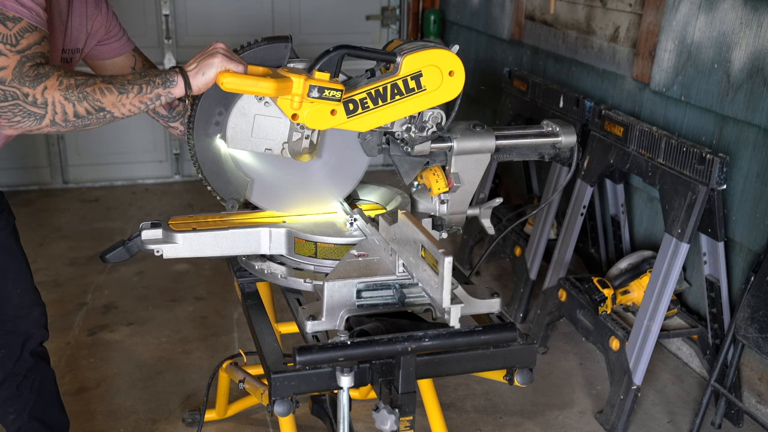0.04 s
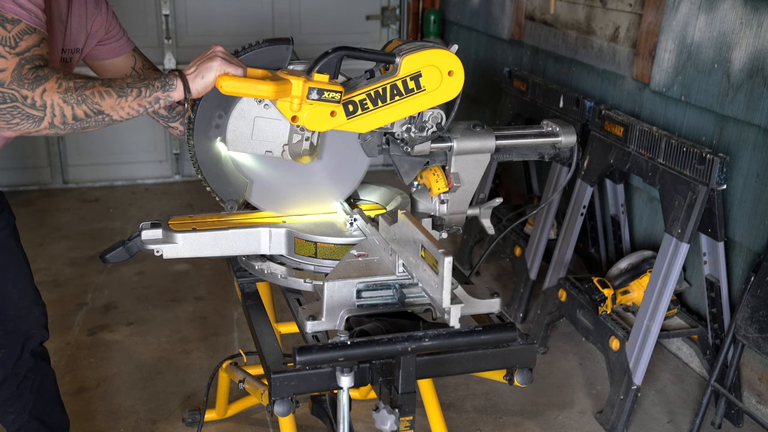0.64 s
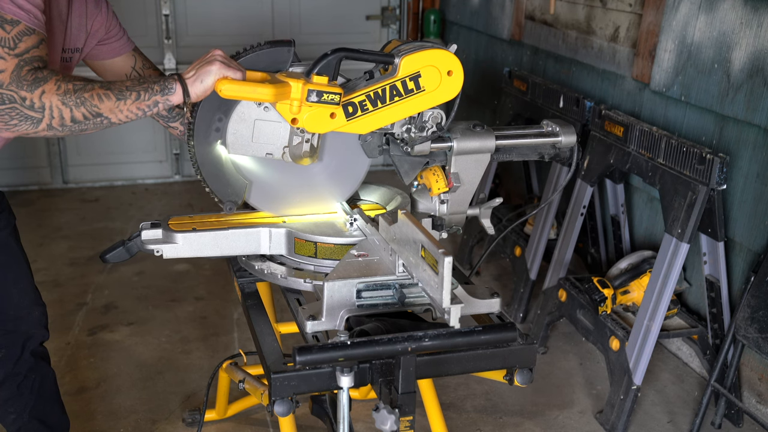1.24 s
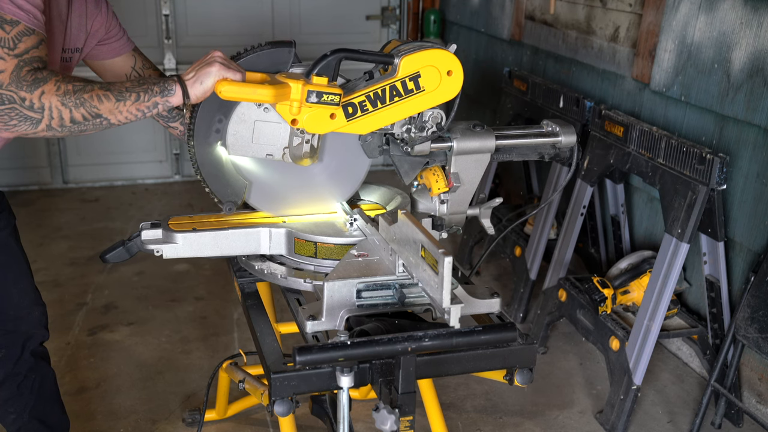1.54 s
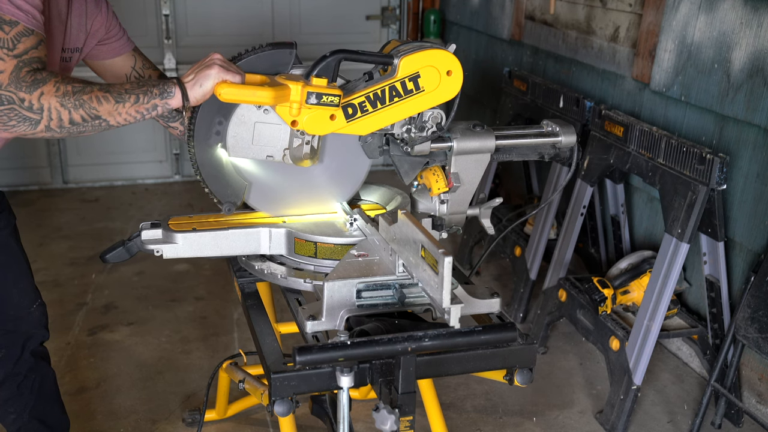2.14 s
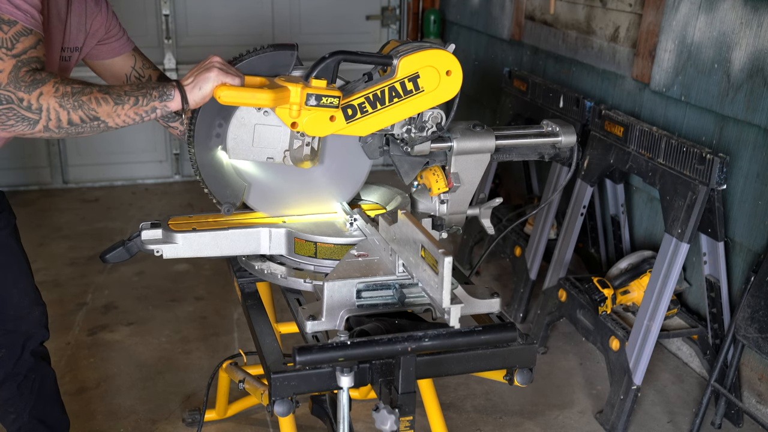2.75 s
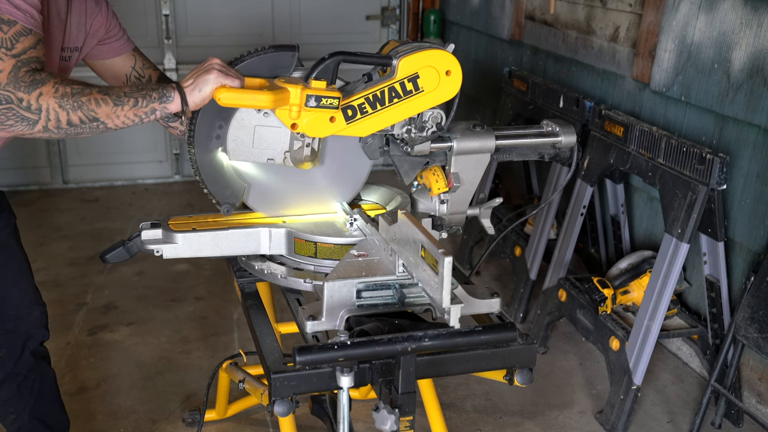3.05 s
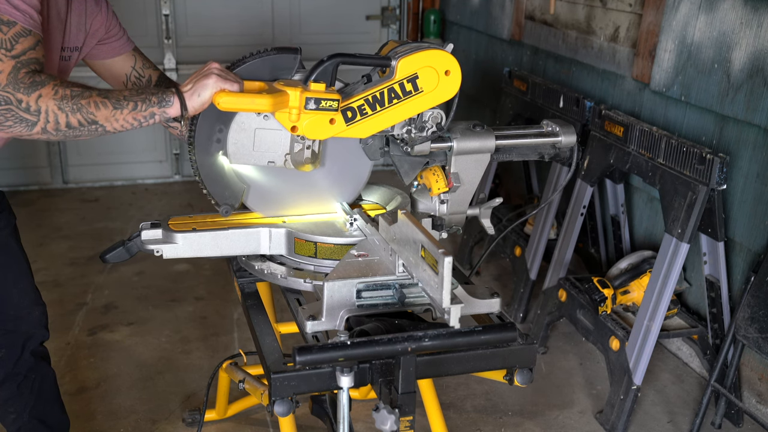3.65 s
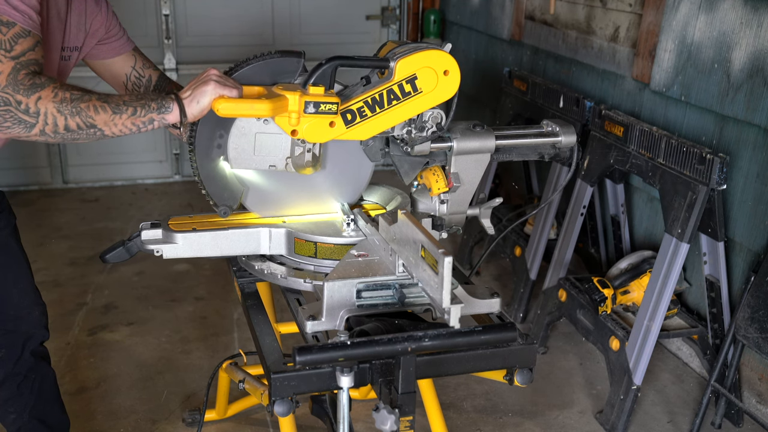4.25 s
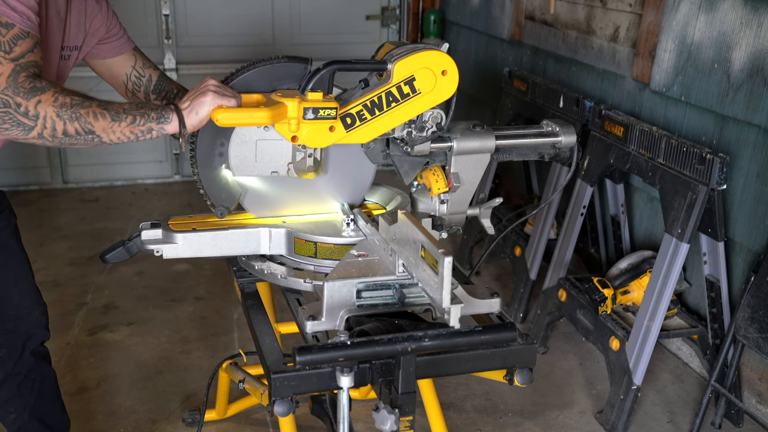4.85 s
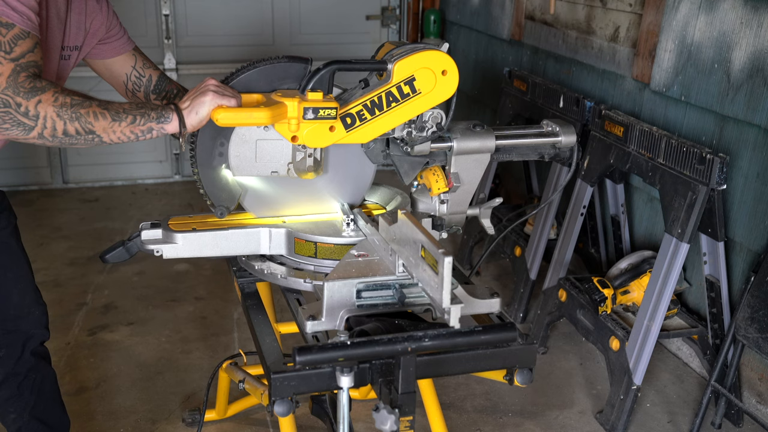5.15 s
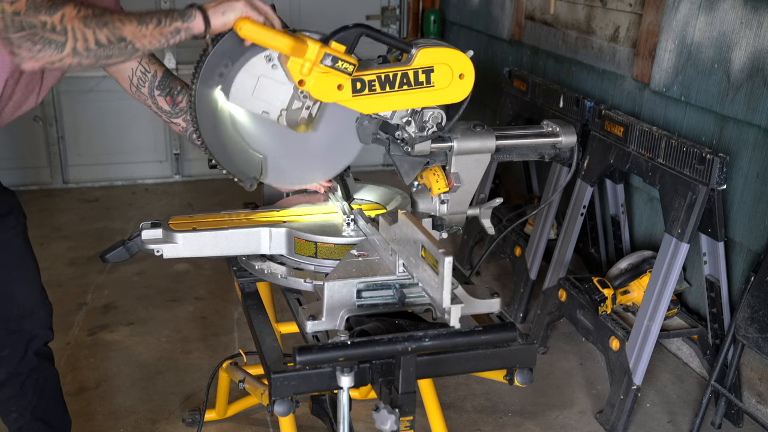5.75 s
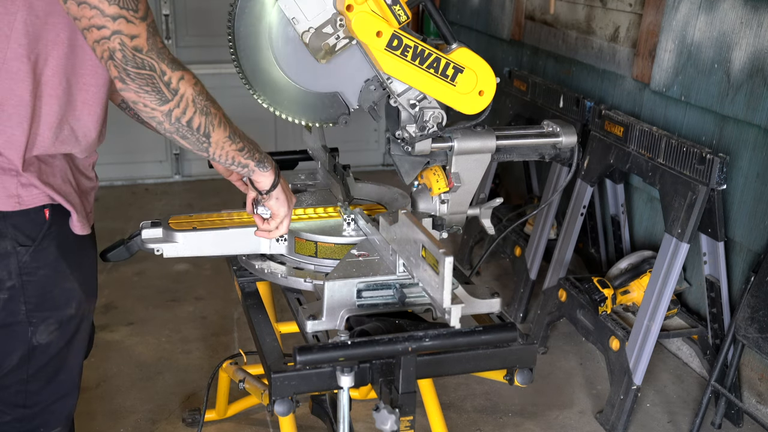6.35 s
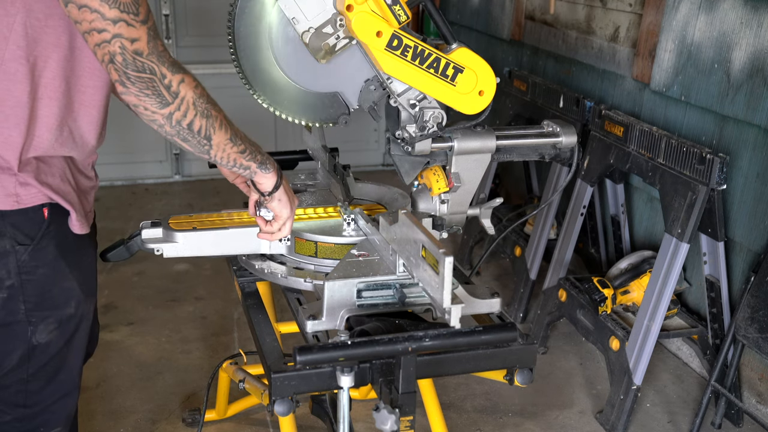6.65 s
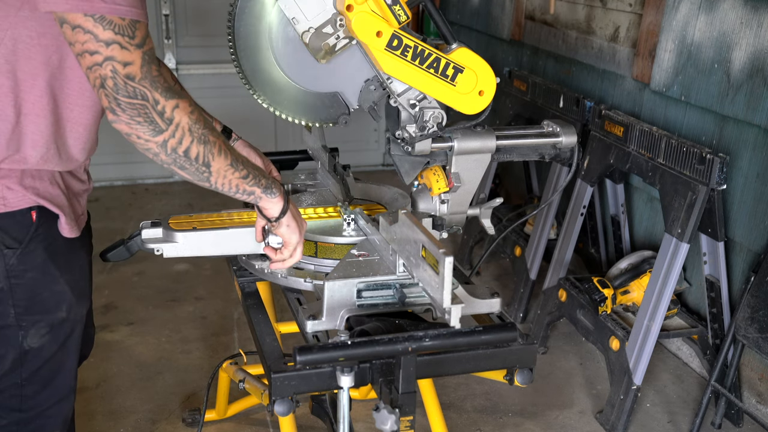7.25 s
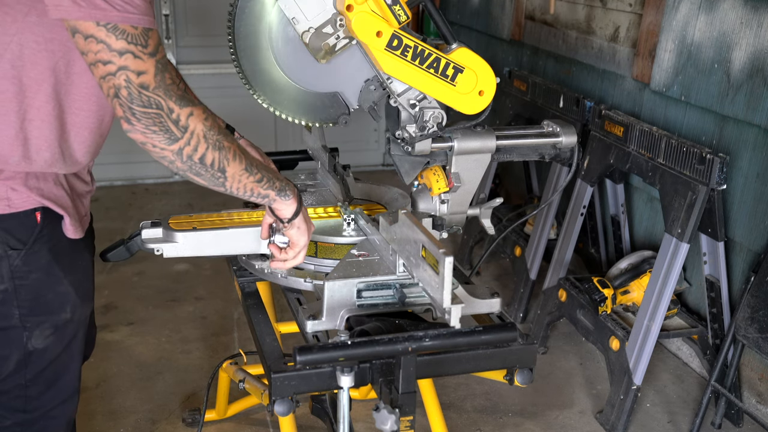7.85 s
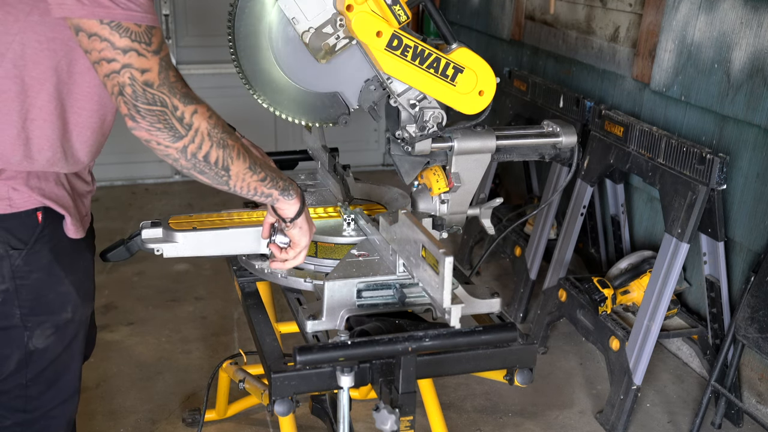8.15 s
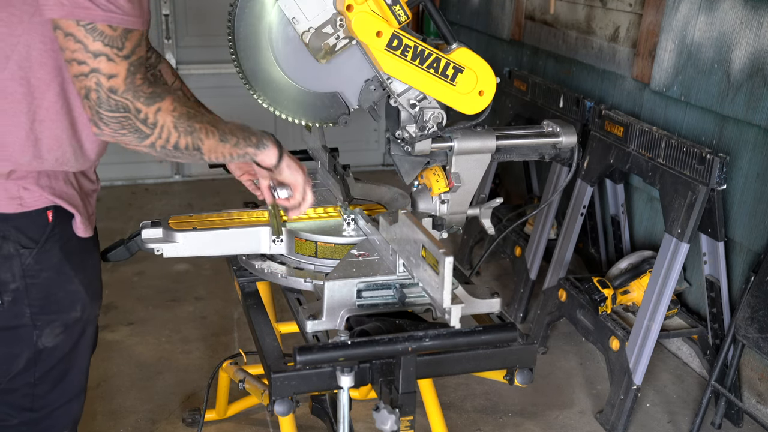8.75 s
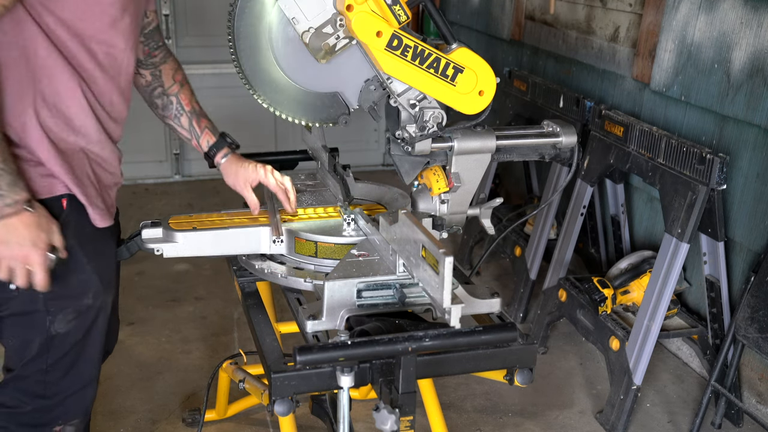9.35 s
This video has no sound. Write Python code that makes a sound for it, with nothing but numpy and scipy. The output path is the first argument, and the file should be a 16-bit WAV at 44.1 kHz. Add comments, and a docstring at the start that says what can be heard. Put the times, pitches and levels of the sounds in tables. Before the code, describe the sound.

From the start, a mitre saw cuts loudly through an aluminium bar in a garage with a short echo. The teeth rasp harshly over the rushing, whining motor, while the blade rings and squeals at shifting high pitches. The motor sags slightly under the load, and the loudness stays even. At about 4.3 seconds the cut ends and the motor runs free, rising a little in pitch, with a few small ticks of loose chips. At 5.7 seconds it is switched off and winds down in fluttering, falling gear whines, which break off abruptly at about 6.4 seconds. A low, quiet room rumble remains. The cut-off piece clinks lightly on the saw table several times until about 7.2 seconds. From 8.7 seconds it taps and scrapes softly across the table, and is put down with a sharp clack at 9 seconds, followed by one faint scrape.

```python
"""In a garage, a mitre saw bites through an aluminium bar: the teeth rasp, the blade rings and squeals.
Pushing the saw slows its motor; the harder the cut, the more the recorder's automatic volume control
turns down fan and room. Once through, the motor runs free, is switched off and winds down in falling
gear whines until the sound breaks off. Over a low room rumble the cut-off piece clinks, scrapes across
the table and is put down with a clack."""
import sys
import numpy as np
from scipy import signal
from scipy.fft import rfft, irfft, next_fast_len
from scipy.io import wavfile
from scipy.ndimage import uniform_filter1d

SR = 44100
rng = np.random.default_rng(int(sys.argv[2]) if len(sys.argv) > 2 else 0)


def to_wav(s):
    """Save 16-bit WAV."""
    ch = np.atleast_2d(s).T  # columns
    pcm = np.round(np.clip(ch, -1, 1) * 32767)  # PCM
    wavfile.write(sys.argv[1], SR, pcm.astype(np.int16))


N = 418950
T = np.arange(N) / SR
THROUGH_S, SWITCH_OFF_S, BREAK_OFF_S = 4.28, 5.715, 6.354
FREE_SPEED = 358  # motor turns per second with nothing to cut

# motor speed as the hand pushes the saw into the bar: time_s, turns_per_s
LOADED_SPEEDS = [(0, 338.5), (0.58, 332.2), (1.1, 337), (1.35, 336.5), (2.1, 326.9), (3.08, 319.3),
                 (3.56, 332.6), (3.85, 332.8), (4.1, 327)]


def cut(speed, turns, cutting, force_db):
    """Each tooth tears off a chip of random size; the slightly uneven blade presses harder once a turn."""
    # tone colour of the teeth tearing metal: pitch_hz, level_db
    rasp_colour = [(500, -30), (1500, -7), (2000, -7.5), (3500, -10.5), (4600, 0.5), (5600, 3.5),
                   (6400, 5.5), (7500, 2.5), (9000, 5), (10200, 4), (13000, 3.5), (14500, 1.5),
                   (15500, -5.5)]
    # loose chips caught by the teeth: time_s, level_db
    loose_chips = [(4.725, -31), (4.995, -34), (5.535, -28), (5.6, -23.5), (5.625, -33)]
    gear_ratio, teeth = .17575, 80  # blade turns per motor turn; teeth on the blade
    blade_turns = turns * gear_ratio
    tooth = (blade_turns * teeth).astype(int)
    chip_sizes = amp(2.5 * rng.standard_normal(tooth[-1] + 1))[tooth]
    sway = np.sin(2 * np.pi * blade_turns)
    entry_db = -9 * np.exp(-T / .14)  # weaker while the teeth first sink in
    bite_db = entry_db + .35 * rubbing() + .68 * wobble(12)
    pressure = amp(-24 + force_db + bite_db + 2 * sway + 1.7 * wobble(50)) * cutting
    for time_s, db in loose_chips:
        pressure += amp(db) * np.exp(-np.abs(T - time_s) / .012)
    tearing = coloured(chip_sizes * rng.standard_normal(N), rasp_colour)
    rasp = pressure * rippled(tearing, depth_db=3, spacing_hz=45)
    ring = blade(speed * gear_ratio * teeth, bite_db, touching=1 - after(THROUGH_S + .03, .12))
    return garage(rasp, wet_db=-2.5) + ring * amp(force_db * cutting + .72 * sway)


def blade(tooth_hz, bite_db, touching):
    """The teeth ring bar and blade; rubbing makes the middle notes screech, and some catch and squeal."""
    # lower ringing notes of the blade and the clamped bar: pitch_hz, level_db
    bar_notes = [(2514, -36.5), (2967, -38), (3171, -36.5), (3300, -35), (3537, -32), (3634, -35),
                 (3753, -35), (3903, -32), (4334, -38.5), (4560, -39), (4722, -43), (4840, -35),
                 (5131, -43), (5249, -37), (5658, -44), (5798, -45), (5927, -39), (6164, -41), (6283, -38),
                 (6466, -41)]
    # high ringing notes of the blade's rim: pitch_hz, level_db
    rim_notes = [(6541, -44), (6746, -39), (7316, -41), (7445, -44), (7768, -42), (8038, -45), (8113, -43),
                 (8318, -46), (8554, -46), (8802, -45), (8899, -45), (9050, -41), (9351, -42), (9534, -40),
                 (10083, -46), (10374, -42), (10460, -45), (10891, -48), (10988, -44), (11074, -43),
                 (12086, -46), (12667, -40), (12743, -43), (13539, -41), (14153, -45), (14336, -49),
                 (14681, -49), (14993, -49), (15230, -50), (15553, -52)]
    # notes that catch and squeal: peak_s, half_length_s, pitch_hz, level_db
    squeal_notes = [(.15, 0.28, 6480, -35.5), (0.118, .3, 9570, -33.5), (0.846, .45, 2520, -29.5),
                    (.645, .25, 5230, -23.5), (.69, 0.14, 4842, -26), (1.2, 1, 3560, -29.5),
                    (1.05, 0.68, 12730, -31), (1.68, 0.15, 5250, -28.5), (1.68, 0.26, 4840, -28),
                    (1.72, 0.47, 4480, -29), (1.85, .27, 9440, -31), (2.04, 0.3, 3308, -28.5),
                    (2.46, 0.21, 8318, -32), (2.75, .4, 13400, -35), (2.94, 0.45, 4490, -28),
                    (3.31, 0.33, 6300, -30.5), (3.5, 0.34, 3577, -26.5), (3.58, 0.15, 4661, -28.5),
                    (3.92, 0.63, 5923, -27.5), (4.11, 0.49, 5100, -31), (4.11, .3, 3210, -27.5),
                    (4.35, 0.45, 2776, -25.5)]
    split_hz = 4200
    low_notes = [(hz, db) for hz, db in bar_notes if hz < split_hz]
    middle_notes = [(hz, db) for hz, db in bar_notes if hz >= split_hz]
    low = amp(.8) * ringing(low_notes, tooth_hz, width_hz=14)
    screech = amp(-26 + rubbing()) * unit(ringing(middle_notes, tooth_hz, width_hz=10))
    rim = amp(-.7 + 1.8 * bite_db) * ringing(rim_notes, tooth_hz, width_hz=18)
    # the higher a squeal, the rougher it is
    squeals = sum(amp(db + 2 * wobble(35)) * swell(peak_s, half_s) * tone(hz * T, width_hz=hz / 600)
                  for peak_s, half_s, hz, db in squeal_notes)
    return (low + screech + rim) * touching + amp(-.5) * squeals


def ringing(notes, tooth_hz, width_hz):
    """Each note of the metal flickers on its own and grows when the teeth strike in step with it."""
    boost_db, near_hz = 5.5, 47
    total = np.zeros(N)
    for hz, db in notes:
        mismatch_hz = hz - np.round(hz / tooth_hz) * tooth_hz
        in_step = 1 / (1 + (mismatch_hz / near_hz) ** 2)
        flicker_db = 3.2 * wobble(3.5) + 2.2 * wobble(30)
        total += amp(db - .6 + boost_db * in_step + flicker_db) * tone(hz * T, width_hz)
    return total


def rubbing():
    """The rise in dB while the side of the blade rubs harder in its slot."""
    # harder rubs: peak_s, rise_db
    rubs = [(.66, 1.5), (1.66, 5.5), (2.22, 3.5), (2.85, 4), (3.1, 2), (4.02, 5)]
    return sum(db * swell(peak_s, half_s=.28) for peak_s, db in rubs)


def rippled(x, depth_db, spacing_hz):
    """The blade's many weak resonances make some pitches a little louder and others softer."""
    heights_db = depth_db * rng.standard_normal(1000)
    pitches_hz = spacing_hz * np.arange(len(heights_db))
    return unit(filtered(x, lambda hz: amp(np.interp(hz, pitches_hz, heights_db))))


def motor(speed, turns, cutting, force_db):
    """The fan rushes, the housing shakes, the brushes (sliding contacts) hiss and the drive whines."""
    # tone colours of fan, housing and brushes: pitch_hz, level_db
    fan_colour = [(100, -40.5), (200, -10.5), (300, -4.5), (500, 3), (800, -1), (1100, 1.5), (1550, 4.5),
                  (2000, -4), (2500, 4.5), (4000, 6.5), (5000, -10), (7600, -23.5), (10000, -21.5),
                  (12000, -30), (15500, -34.5)]
    housing_colour = [(200, -53.5), (1000, -10), (1500, -9.5), (2100, -7), (2600, -8), (3200, -0.5),
                      (3700, 3), (4150, -0.5), (4700, -12.5), (8000, -16), (11000, -24), (15500, -46)]
    brush_colour = [(3000, -16), (5000, 5.5), (7600, 2.5), (9000, -26.5), (12000, -4.5), (15500, -12.5)]
    powered = 1 - after(SWITCH_OFF_S, .04)
    octaves = np.log2(speed / FREE_SPEED)  # falls by 1 each time the speed halves
    fan = amp(-20.5 + 8 * octaves + .87 * wobble(4) + .51 * wobble(14)) * noise(fan_colour)
    # the housing shakes with the cutting force, then with the speed alone
    idle_db = -19.5 * powered - 20 * (1 - powered) + 7.5 * octaves
    shake_db = (-22.5 + force_db) * cutting + idle_db * (1 - cutting)
    shake = amp(shake_db + .78 * wobble(7) + 1.7 * wobble(60)) * noise(housing_colour)
    brushes = amp(-31.5 + 1.1 * wobble(40)) * noise(brush_colour) * (speed / FREE_SPEED) ** 1.9
    rush = garage(fan + shake + brushes, wet_db=-5.5)
    return rush + whine(turns, cutting) * powered * amp(force_db * cutting)


def motor_speed():
    """Turns per second: held down by the cut, recovering afterwards, then slowed by brake and air."""
    recover_s, brake_s = .82, .91
    air_drag = 1.3  # how many times stronger than the brake at full speed
    release_s = LOADED_SPEEDS[-1][0]
    recovery_time = np.clip(T, release_s, SWITCH_OFF_S) - release_s
    driven = FREE_SPEED - (FREE_SPEED - curve(LOADED_SPEEDS)) * np.exp(-recovery_time / recover_s)
    braked = np.exp(-np.maximum(T - SWITCH_OFF_S, 0) / brake_s)
    return driven * braked / (1 + air_drag * (1 - braked))


def whine(turns, cutting):
    """Shaft, gears and teeth sing in step with the motor; free gears rattle and chop the high tones."""
    # tones under power: cycles_per_turn, width_hz, cutting_db, free_db
    drive_tones = [(1, .2, -40.5, -37), (1.37, 2, -44.5, -39), (1.69, 3, -49, -39.5), (2, .3, -46, -37),
                   (2.59, 3, -49.5, -38.5), (7.56, 5, -39, -38), (14.06, 30, -37, -42),
                   (15.81, 8, -40, -52), (19, 3, -48, -43), (22.4, 150, -42, -38), (27.95, 140, -35.5, -42),
                   (37.97, 90, -41, -54), (42.03, 110, -39, -52)]
    rattle = wobble(70)
    total = np.zeros(N)
    for per_turn, width_hz, cutting_db, free_db in drive_tones:
        level_db = free_db + (cutting_db - free_db) * cutting
        rattle_db = (3.5 * rattle - 2) * (1 - cutting) * (per_turn > 20)
        total += amp(level_db + 2 * wobble(7) + rattle_db) * tone(per_turn * turns, width_hz)
    return total


def coasting_gears(speed, turns):
    """Slack gears lose and find contact; their falling tones flutter, and flare where the case rings."""
    # tones of the slack gears: cycles_per_turn, level_db
    gear_tones = [(1, -28), (7.6, -19), (10.55, -32), (12.8, -33), (14.15, -20), (15.5, -30), (21.9, -28),
                  (22.7, -34), (26.2, -21), (28, -33), (30.6, -36), (38, -33), (42.2, -33), (56, -30),
                  (70.5, -31)]
    # how strongly the gear case passes each pitch: pitch_hz, level_db
    case_colour = [(120, -30), (200, -21.5), (300, -6), (520, -6.5), (750, -22.5), (1050, -25), (1480, -1),
                   (1700, -12), (1950, -3.5), (2200, -9), (2680, 1), (3000, -1.5), (3300, -2.5), (3750, 2),
                   (4100, -2), (4500, -14.5), (6500, -16), (9500, -10.5), (12000, -28.5)]
    gears = sum(amp(db + 3.6 * wobble(55)) * tone(per_turn * turns, width_hz=.45 * per_turn)
                for per_turn, db in gear_tones)
    # slower teeth strike more softly
    strength = after(SWITCH_OFF_S, .01) * amp(1.5) * (speed / FREE_SPEED) ** 1.2
    return garage(shaped(gears * strength, case_colour), wet_db=-3.5)


def offcut():
    """The cut-off piece knocks on the table and rings; between knocks it scrapes along."""
    # contacts with the table: start_s, level_db, ring_above_knock_db, fade_s
    taps = [(6.4, -51, -25, .025), (6.476, -49, 1.5, .05), (6.632, -56.5, -9, .03),
            (6.688, -57, -5.5, 0.022), (6.94, -61, -22, .12), (7.234, -51, -18, .03),
            (7.866, -66, -18, .02), (8.686, -50.5, -22, .04), (8.733, -38.5, -30, 0.15),
            (8.864, -45, -25, .015), (8.925, -40, -26, .04), (9.036, -39, -29.5, .03),
            (9.0418, -13, -44, 0.025)]
    # ringing notes of the aluminium piece: pitch_hz, level_db, fade_s (time to fall 60 dB)
    metal_notes = [(2810, -6, .45), (4740, -7, .5), (7040, -1.5, .22), (7470, -3, .16), (9250, -3, 0.22),
                   (10510, -6.5, .16), (11860, -11, .18)]
    # tone colour of a knock: pitch_hz, level_db
    knock_colour = [(200, -23), (400, -14), (750, -12), (1700, -11.5), (2500, -4.5), (3200, 0),
                    (4300, -3.5), (5200, -7.5), (6200, -10), (10600, -13), (15500, -23)]
    blows, rings = np.zeros(N + SR), np.zeros(N + SR)
    t = T[:SR // 2]
    for start_s, db, ring_db, contact_s in taps:
        start = round(start_s * SR)
        blows[start:start + len(t)] += amp(db) * np.sqrt(contact_s * SR / 14) * burst(t, contact_s)
        ring = sum(amp(note_db + rng.normal(0, 2) - 60 * t / fade_s) * np.sin(2 * np.pi * hz * t)
                   for hz, note_db, fade_s in metal_notes)
        rings[start:start + len(t)] += amp(db + ring_db) * ring
    knocks = amp(5.5) * shaped(blows[:N], knock_colour)
    return garage(saw_table(knocks + sliding()) + amp(-12.5) * rings[:N], wet_db=-3.5)


def burst(t, fade_s):
    """One contact: a short crack of energy 1, spread evenly over all pitches."""
    crack = rng.standard_normal(len(t)) * amp(-60 * t / fade_s) * (1 - np.exp(-t / .0012))
    phases = np.angle(rfft(crack))
    even = irfft(np.exp(1j * phases), len(t)) * np.exp(-t / fade_s)
    return even / np.linalg.norm(even)


def sliding():
    """Metal and sleeve slide over the table with a grainy scrape that grows as they gather speed."""
    # slides: start_s, end_s, end_level_db
    slides = [(6.916, 7.031, -72.5), (8.66, 8.75, -62), (8.75, 8.848, -59), (8.871, 9.043, -53.5),
              (9.379, 9.5, -63)]
    # tone colour of the scrape: pitch_hz, level_db
    scrape_colour = [(240, -58.5), (400, -17), (496, 4.5), (560, -6), (900, -15), (972, -14.5), (3790, -4),
                     (5480, -14.5), (7910, -12.5), (15500, -21)]
    roughness = amp(3.5 * wobble(500) + 2 * wobble(45))
    grains = coloured(roughness * rng.standard_normal(N), scrape_colour)
    loudness = np.zeros(N)
    for start_s, end_s, db in slides:
        growth = amp(db + 24 * np.minimum(T - end_s, 0))  # 24 dB a second
        fade = np.exp(-np.maximum(T - end_s, 0) / .044)
        loudness += after(start_s, .015) * growth * fade
    return loudness * grains


def saw_table(x):
    """The table passes a contact on partly as a dull knock, partly by ringing at its own pitches."""
    # resonances of the table: pitch_hz, width_hz, level_db
    resonances = [(2175, 64, -3), (2790, 33, -3), (3080, 18, -6), (3230, 36, -4), (3550, 140, -4.5),
                  (4110, 86, -4), (6160, 110, -7), (7030, 47, -13), (7730, 38, -10)]

    def response(hz):
        ring = sum((-1) ** k * amp(db) * 1j * hz * width / (pitch ** 2 - hz ** 2 + 1j * hz * width)
                   for k, (pitch, width, db) in enumerate(resonances))
        return 1 + amp(-1) * 1j * ring
    return filtered(x, response)


def garage(x, wet_db):
    """Bare walls add an echo, wet_db relative to the direct sound, at about the same total power."""
    # how long the echo lasts: pitch_hz, fade_s (time to fall 60 dB)
    echo_times = [(200, 0.25), (1000, 0.5), (3500, 0.39), (8000, 0.27), (15000, 0.29)]
    hz, t, spectrum = signal.stft(rng.standard_normal(SR // 2), SR, nperseg=256)
    fade = amp(-60 * t / along(echo_times, hz)[:, None])
    tail = signal.istft(spectrum * fade, SR, nperseg=256)[1]
    tail = np.pad(tail / np.linalg.norm(tail), (SR // 200, 0))  # arrives 5 ms late
    echo = amp(wet_db) * signal.fftconvolve(x, tail)[:N]
    return (x + echo) / np.hypot(1, amp(wet_db))


def room_tone():
    """A low unsteady rumble under faint hiss."""
    # tone colour of the quiet room: pitch_hz, level_db
    room_colour = [(25, -35.5), (38, -27), (50, -19.5), (63, 0), (80, -2.5), (120, -8), (170, -12),
                   (260, -20.5), (450, -28), (1000, -30.5), (2000, -36.5), (3500, -34.5), (4200, -40),
                   (5300, -53.5), (9000, -57.5), (15500, -61.5)]
    return amp(-52.5 + .47 * wobble(2.6)) * noise(room_colour)


def amp(db):
    """Turn decibels into a gain."""
    return 10 ** (np.asarray(db) / 20)


def unit(x):
    """Scale to an average strength (rms) of 1."""
    return x / np.sqrt(np.mean(x ** 2) + 1e-20)


def along(points, hz):
    """Read between (pitch_hz, value) rows, giving each octave equal room."""
    pitches, values = np.transpose(points)
    return np.interp(np.log(hz + 1), np.log(pitches), values)


def curve(rows):
    """Turn (time_s, value) rows into one value per sample."""
    return np.interp(T, *np.transpose(rows))


def after(time_s, fade_s):
    """A smooth step from 0 to 1 around time_s."""
    return .5 + .5 * np.tanh((T - time_s) / fade_s)


def swell(peak_s, half_s):
    """A smooth rise from 0 to 1 and back around peak_s."""
    return np.cos(np.pi / 2 * np.clip((T - peak_s) / half_s, -1, 1)) ** 2


def wobble(rate):
    """A smooth random curve of strength 1 with rate new values a second."""
    knots = rng.standard_normal(int(T[-1] * rate) + 2)
    smooth = signal.resample(knots, 8 * len(knots))
    return unit(np.interp(T, np.linspace(0, T[-1], len(smooth)), smooth))


def filtered(x, response):
    """Scale each pitch in x by response(hz)."""
    size = next_fast_len(N + SR // 2)
    return irfft(rfft(x, size) * response(np.fft.rfftfreq(size, 1 / SR)), size)[:N]


def shaped(x, colour):
    """Filter x by (pitch_hz, level_db) rows."""
    return filtered(x, lambda hz: amp(along(colour, hz)))


def coloured(x, colour):
    """Give x a tone colour, at strength 1."""
    return unit(shaped(x, colour))


def noise(colour):
    """Noise with a tone colour, at strength 1."""
    return coloured(rng.standard_normal(N), colour)


def tone(cycles, width_hz):
    """A sine of strength 1 whose random drift smears its pitch over width_hz."""
    drift = np.cumsum(rng.standard_normal(len(cycles))) * np.sqrt(2 * np.pi * abs(width_hz) / SR)
    return np.sqrt(2) * np.sin(2 * np.pi * cycles + drift)


def scene():
    """The saw, then the offcut, heard in the middle; the harder the cut, the slower and louder the saw."""
    speed = motor_speed()
    turns = np.cumsum(speed) / SR
    cutting = 1 - after(THROUGH_S, .06)
    lost_speed = FREE_SPEED - curve(LOADED_SPEEDS)
    force_db = 4 + .1 * (lost_speed - 28)  # an average cut costs 28 turns a second
    saw = motor(speed, turns, cutting, force_db) + coasting_gears(speed, turns)
    saw += cut(speed, turns, cutting, force_db)
    mono = saw * (1 - after(BREAK_OFF_S, .001)) + offcut() + room_tone()
    return np.array([mono, mono])


def record(dry):
    """Volume control holds the saw at one level; the microphone rounds peaks and loses the top treble."""
    target_db, max_gain_db, window_s, top_hz = -16.5, 6, .25, 15780
    power = uniform_filter1d(dry[0] ** 2, int(window_s * SR))
    loudness = np.sqrt(np.abs(power) + 1e-12)
    levelled = dry * np.minimum(amp(target_db) / loudness, amp(max_gain_db))
    rounded = levelled / (1 + np.abs(levelled / .7) ** 6) ** (1 / 6)
    return np.array([filtered(channel, lambda hz: hz < top_hz) for channel in rounded])


dry = scene()
out = record(dry)
to_wav(out)
```